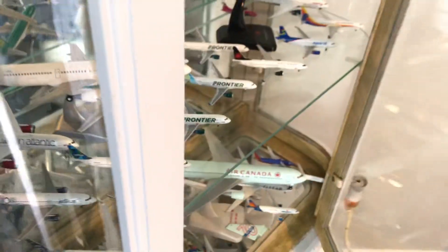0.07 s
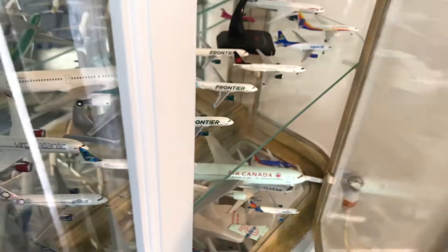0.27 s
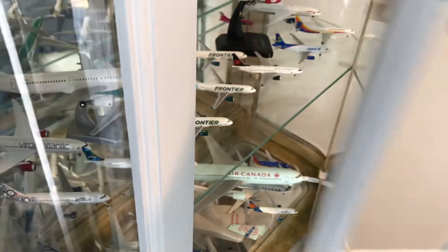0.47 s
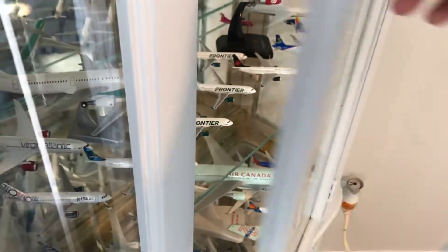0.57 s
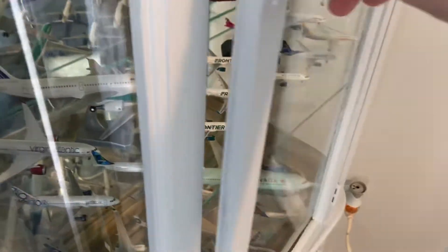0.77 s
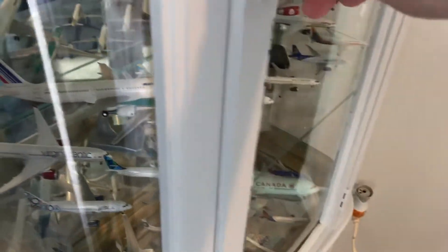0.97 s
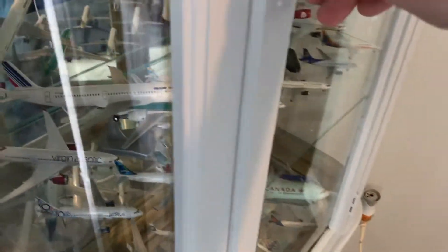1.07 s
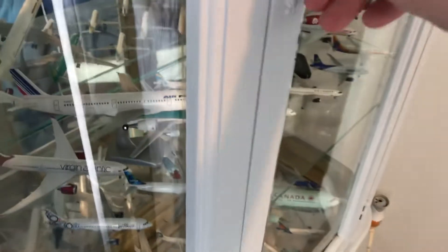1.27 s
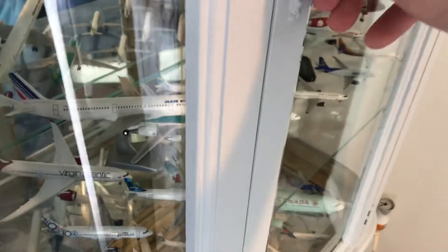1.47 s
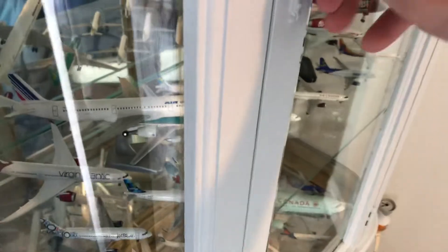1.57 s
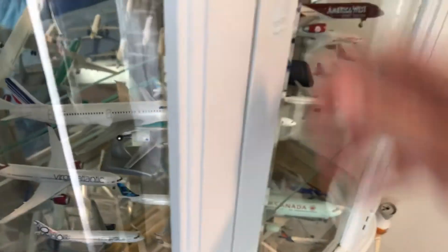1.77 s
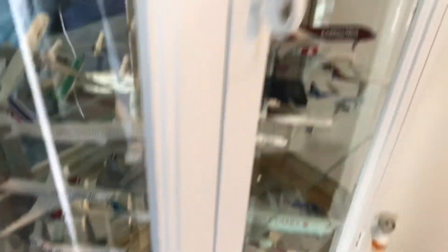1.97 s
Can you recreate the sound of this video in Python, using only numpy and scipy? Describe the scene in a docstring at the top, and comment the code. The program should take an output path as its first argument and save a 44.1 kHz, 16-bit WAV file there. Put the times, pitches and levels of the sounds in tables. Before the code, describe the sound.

A glass cabinet door knocks lightly, then shuts with a loud, briefly ringing thud.

```python
"""A sticking glass cabinet door is pushed shut in a small room, close to the microphone.
It meets the frame with a light knock, sticks, scrapes free in many tiny slips and slams home.
Each blow makes the frame clack and sets the glass and the cabinet ringing briefly.
Hinge and catch tick, the dry hinge hisses faintly as the door swings, and fingers rub the frame
and let go with a soft bump. A low room rumble lies under it all."""
import sys
import numpy as np
from scipy import signal
from scipy.fft import rfft, irfft
from scipy.io import wavfile
from scipy.ndimage import uniform_filter1d

SR = 44100
rng = np.random.default_rng(int(sys.argv[2]) if len(sys.argv) > 2 else 0)


def dump(signal):
    """Clip the signal to [-1, 1] and save it as 16-bit WAV at the path in sys.argv[1]."""
    limited = np.clip(np.atleast_2d(signal).T, -1, 1)
    pcm = np.round(limited * 32767).astype(np.int16)
    wavfile.write(sys.argv[1], SR, pcm)


N = 88332

# Blows of the door: t/s, clack level/dB, clack cut-off/Hz, glass level/dB, glass tilt/dB per octave,
# cabinet level/dB, cabinet ring time multiplier, cabinet tilt/dB per octave
DOOR_BLOWS = [(0.9695, -28.5, 600, -56, 0, -23, 0.8, -5), (0.978, -25, 10500, -47, 3, -44, 0.85, 4.5),
              (1.2771, -7.3, 5800, -25.5, 0, -15.6, 0.88, -6)]
def knocks():
    """Each blow of the door clacks the frame, rings the glass and thumps the cabinet."""
    out = 0
    for start, clack_db, cut_hz, glass_db, glass_tilt, thump_db, sustain, thump_tilt in DOOR_BLOWS:
        out += frame_clack(start, clack_db, cut_hz)
        out += undb(glass_db) * glass_ring(start, glass_tilt)
        out += undb(thump_db) * cabinet_thump(start, thump_tilt, sustain)
    return out

# Tone of the frame's clack: f/Hz, level/dB
CLACK_TONE = [(100, -10.5), (300, 0), (550, -5), (1000, -5), (2000, -4), (3200, -5.5), (5000, -9.5),
              (8000, -18.5), (11000, -15.5), (16000, -9.5)]
def frame_clack(start, db, cut_hz):
    """The door hits and bounces once. A softer hit has a lower cut-off and sounds duller."""
    gain = tone(CLACK_TONE) / np.hypot(1, (freqs() / cut_hz) ** 2)
    bounce_s, bounce_db = 0.004, -8
    return clatter(gain, [start, start + bounce_s], undb([db, db + bounce_db]))

# Notes the glass rings at: f/Hz, level/dB, ring time/s (the time to fade by 60 dB)
GLASS_NOTES = [(674, -1, 0.28), (808, -7, .26), (1081, 0.5, .23), (1441, -2, 0.16), (1884, -1, 0.16),
               (1939, 0, 0.22), (2049, 4.5, 0.14), (2118, 3, 0.11), (2569, 3, 0.15), (2976, -5.5, 0.29),
               (3023, -4.5, .29), (3235, -2.5, 0.24), (3305, -6.5, 0.3), (3386, -4, .19), (3683, -7, .24),
               (4334, -9, .23)]
def glass_ring(start, tilt):
    """The shaken pane rings almost at once with high notes."""
    return ring(tilted(GLASS_NOTES, tilt, pivot_hz=2000), start, build_s=0.0021)

# Notes the cabinet rings at: f/Hz, level/dB, ring time/s
CABINET_NOTES = [(56.5, -29.5, 1.6), (77.7, -15, 0.46), (99, -8.5, .44), (117.5, 1, 0.3), (147.5, -8, .43),
                 (159.3, -4.7, 0.28), (194.7, 9.3, 0.19), (224.5, -9.6, .42), (297, -2.5, 0.26),
                 (326.5, -12, .52), (378, 2.5, .2), (427, 3, .27)]
def cabinet_thump(start, tilt=0, sustain=1):
    """The cabinet's low notes build more slowly. A sustain below 1 is the hand damping them."""
    return ring(tilted(CABINET_NOTES, tilt, pivot_hz=150), start, build_s=0.019, sustain=sustain)

# How long a clatter lasts in the room: f/Hz, ring time/s
RING_TIMES = [(100, .42), (400, 0.26), (1000, 0.25), (3000, 0.17), (7000, 0.24), (15000, 0.14)]
def clatter(gain, times, sizes):
    """Frame and room ring at countless notes: each hit adds a crack, a tail and a faint late echo."""
    t, hits = since(0), np.zeros(N)
    np.add.at(hits, (np.array(times) * SR).astype(int), np.square(sizes))
    spectrum, out = rfft(noise(gain)), 0
    lowest_hz, crack_gain, build_cycles = 62.5, undb(9.5), 0.77
    octave = np.log2(np.clip(freqs(), lowest_hz, 16000) / lowest_hz)
    crack = crack_gain * np.exp(-t / 0.0047)
    echo = undb(-30.5) * die_away(t, ring_s=0.9)
    for k in range(9):
        hz = lowest_hz * 2 ** k
        band = irfft(spectrum * np.maximum(1 - abs(octave - k), 0), N)
        tail = die_away(t, lookup(RING_TIMES, hz))
        build = 1 - np.exp(-t * hz / build_cycles)  # the lows come late
        one_hit = np.hypot(crack, tail + echo) * build
        energy = signal.fftconvolve(hits, one_hit ** 2)[:N]
        out += band * np.sqrt(abs(energy))
    return out / np.hypot(1, crack_gain)

# Tone of the edge while it sticks: f/Hz, level/dB
CREAK_TONE = [(100, -5), (600, -2.5), (1100, -3.5), (1500, 7.5), (2500, -9), (5000, -13), (16000, -28)]
# Tone of the edge as it comes free: f/Hz, level/dB
SCRAPE_TONE = [(100, -18), (350, -3.5), (700, -5.5), (1150, 5.5), (2000, 0.5), (3800, 2), (5200, -8.5),
               (7000, -4), (10500, -13.5), (14500, -8), (16000, -5)]
def sticking_edge():
    """The edge creaks and the cabinet groans under the push, then it scrapes free with a tiny squeak."""
    creak = undb(-41) * slips(CREAK_TONE, start=1.212, length=0.05, force_db=[-8.5, -0.41, 0])
    groan = undb(-50) * band_noise(hz=55, width_hz=80) * swell(1.205, 0.045)
    scrape = undb(-14.5) * slips(SCRAPE_TONE, start=1.2545, length=0.026, force_db=[-4.5, 1, -11, -13])
    squeak = undb(-5) * band_noise(hz=15400, width_hz=7800) * swell(1.2615, 0.00088)
    thump = undb(-23.5) * cabinet_thump(start=1.2645)
    return creak + groan + scrape + squeak + thump

def slips(points, start, length, force_db, slips_per_s=900, scatter_db=3):
    """The edge grips and slips unevenly. Each slip rattles the frame, louder with more force."""
    gap_luck, size_luck = rng.standard_normal((200, 2)).T
    gaps = np.exp(0.5 * gap_luck) / slips_per_s
    at = np.cumsum(gaps) - gaps[0]
    push_db = np.interp(at, np.linspace(0, length, len(force_db)), force_db)
    sizes = undb(push_db + scatter_db * size_luck)
    rattle = clatter(tone(points), start + at[at < length], sizes[at < length])
    return rattle / np.std(rattle[int(start * SR):int((start + length) * SR)])

# Ticks of hinge and catch, and the bright tick of the door's first touch on the frame: t/s, level/dB, f/Hz,
# band width/Hz
SMALL_TICKS = [(0.612, -56.5, 4000, 12000), (0.9697, -48, 11000, 14000), (1.1125, -44, 4000, 3600),
               (1.179, -44.5, 6500, 11030), (1.444, -48, 3600, 5000), (1.7287, -53, 5830, 9000),
               (1.7658, -45, 850, 1500), (1.9391, -46, 9000, 3200), (1.970, -53.5, 2367, 495),
               (1.996, -50.5, 2340, 500)]
def ticks():
    """Hinge and catch give tiny dry clicks, as does the door's first touch on the frame, each with a little
    room echo."""
    out = 0
    for start, db, hz, width_hz in SMALL_TICKS:
        t = since(start)
        click = np.exp(-t / 0.0018)
        echo = undb(-17) * die_away(t, lookup(RING_TIMES, hz))
        out += undb(db) * band_noise(hz, width_hz) * (click + echo) * (t > 0)
    return out

# Finger strokes: middle t/s, length/s, level/dB, f/Hz
FINGER_STROKES = [(0.097, 0.02, -54.5, 3100), (0.162, 0.055, -59.5, 5860), (0.259, 0.045, -61, 5500),
                  (0.621, 0.029, -60, 905), (0.691, 0.022, -64, 4300), (1.18, .06, -56, 1320),
                  (1.558, 0.031, -57.5, 1090), (1.616, 0.16, -62.5, 6110), (1.787, 0.045, -54, 5000),
                  (1.92, 0.07, -63.5, 4530)]
# Tone shared by all strokes: f/Hz, level/dB
RUB_TONE = [(200, 4.5), (1200, 3.5), (2400, -8), (3800, -4), (6000, -7.5), (10000, -13), (15000, -4.5)]
def finger_rubs():
    """Fingers slide on the frame, each stroke a soft swell of hiss."""
    return sum(undb(db) * swell(middle, length) * noise(tone(RUB_TONE) * resonance(hz, 2.65 * hz))
               for middle, length, db, hz in FINGER_STROKES)

# Bumps of the other hand: middle t/s, length/s, level/dB
BUMPS = [(0.01, 0.07, -50), (2.0, 0.019, -45)]
def hand_bumps():
    """The other hand bumps the microphone with dull thuds."""
    level = sum(undb(db) * swell(middle, length) for middle, length, db in BUMPS)
    return level * band_noise(hz=90, width_hz=150)

# Notes of the door springing back: f/Hz, level/dB, ring time/s
SPRING_NOTES = [(153.7, -39.5, 0.42), (177.3, -32, 0.17), (384, -46, 0.13)]
def letting_go():
    """The fingers let go and the door springs back with a soft bump."""
    return ring(SPRING_NOTES, start=1.770, build_s=0.011)

# Thin notes of the hinge: f/Hz, level/dB, end t/s
HINGE_NOTES = [(3260, -1, .89), (3760, -7, .42), (4770, -4.5, 0.3), (5640, -6, .29), (6580, -6, 0.33)]
# Loudness of the hinge along the swing: t/s, level/dB
SWING_LEVEL = [(.12, -68.5), (.4, -69.5), (.56, -84), (.8, -72), (.9, -76)]
def hinge(start=0.09, catches_per_s=1200, scatter_db=3):
    """The dry hinge catches unevenly and rings thin notes; the high ones drop out first."""
    t, out = since(0), 0
    caught = rng.random(N) < catches_per_s / SR
    catches = rfft(caught * undb(scatter_db * rng.standard_normal(N)))
    for hz, db, end in HINGE_NOTES:
        sounding = uniform_filter1d(1. * ((t > start) & (t < end)), size=2000)  # soft on and off
        out += undb(db) * sounding * unit(irfft(catches * resonance(hz, width_hz=350), N))
    return out * loudness(SWING_LEVEL)

# Tone of the room's rumble and hiss: f/Hz, level/dB
RUMBLE_TONE = [(20, -27), (55, 2.5), (157, -10), (256, -9), (400, -19), (1290, -24.5), (3160, -30.5),
               (4370, -35.5), (16000, -41)]
# Loudness of the rumble: t/s, level/dB
RUMBLE_LEVEL = [(0, -54.5), (0.652, -56), (0.92, -58.5), (1.2, -52.5), (2.0, -58)]
def room():
    """A low rumble that wavers, with a faint hiss and hum."""
    rumble = loudness(RUMBLE_LEVEL) * noise(tone(RUMBLE_TONE))
    hum = undb(-68) * band_noise(hz=355, width_hz=35)
    return rumble + hum

def ring(notes, start, build_s, sustain=1):
    """Notes that build up, then fade. Two by two, they swing in opposite directions."""
    t, out = since(start), 0
    for k, (hz, db, ring_s) in enumerate(notes):
        direction = (-1) ** (k // 2)
        out += direction * undb(db) * die_away(t, ring_s * sustain) * np.sin(2 * np.pi * hz * t)
    return (1 - np.exp(-t / build_s)) * out

def tilted(notes, db_per_octave, pivot_hz):
    """The same notes, struck so that the high ones are louder or softer."""
    return [(hz, db + db_per_octave * np.log2(hz / pivot_hz), ring_s) for hz, db, ring_s in notes]

def noise(gain):
    """Noise of standard strength, shaped by a gain at each frequency."""
    return unit(irfft(rfft(rng.standard_normal(N)) * gain, N))

def band_noise(hz, width_hz):
    return noise(resonance(hz, width_hz))

def resonance(hz, width_hz):
    """Gains that let through the frequencies near hz."""
    f = freqs() + 1
    return 1 / (1 + ((f * f - hz * hz) / (f * width_hz)) ** 2)

def lookup(points, hz):
    """Read between a table's rows, with octaves evenly spaced."""
    row_hz, values = np.array(points).T
    return np.interp(np.log(np.maximum(hz, 1)), np.log(row_hz), values)

def tone(points):
    """A gain for every frequency."""
    return undb(lookup(points, freqs()))

def loudness(points):
    """A gain for every moment."""
    return undb(np.interp(since(0), *np.array(points).T))

def swell(middle_s, length_s):
    """A bell-shaped rise and fall."""
    return np.exp(-2 * ((since(0) - middle_s) / length_s) ** 2)

def die_away(t, ring_s):
    """A fade that falls 60 dB in ring_s seconds."""
    return np.exp(-np.log(1000) * t / ring_s)

def since(start):
    """Seconds since a moment, zero before it."""
    return np.maximum(np.arange(N) / SR - start, 0)

def freqs():
    return np.arange(N // 2 + 1) * SR / N

def undb(db):
    return 10 ** (np.asarray(db) / 20)

def unit(x):
    return x / np.sqrt(np.mean(x ** 2))

def scene():
    """Door, hands and room together in one channel."""
    door = knocks() + sticking_edge() + ticks()
    hands = finger_rubs() + hand_bumps() + letting_go()
    return (door + hands + hinge() + room())[None]

def record(dry, low_cut_hz=35, top_hz=15800):
    """Thin out the deepest bass and cut the highest treble."""
    thin = signal.sosfilt(signal.butter(2, low_cut_hz, "high", fs=SR, output="sos"), dry)
    return signal.sosfilt(signal.ellip(10, .2, 80, top_hz, fs=SR, output="sos"), thin)

dry = scene()
out = record(dry)
dump(out)
```